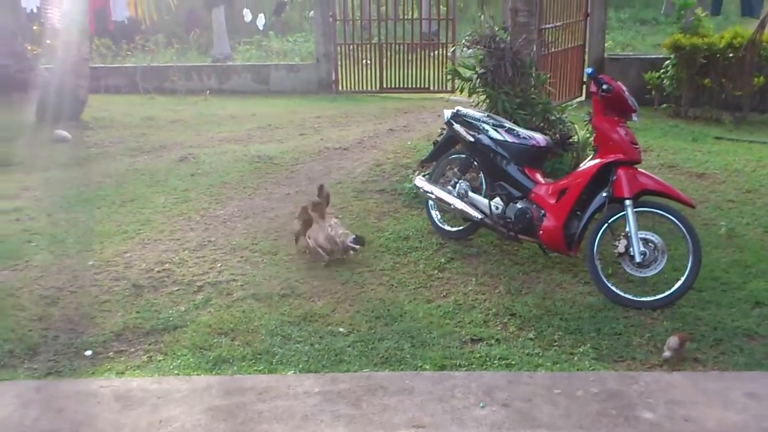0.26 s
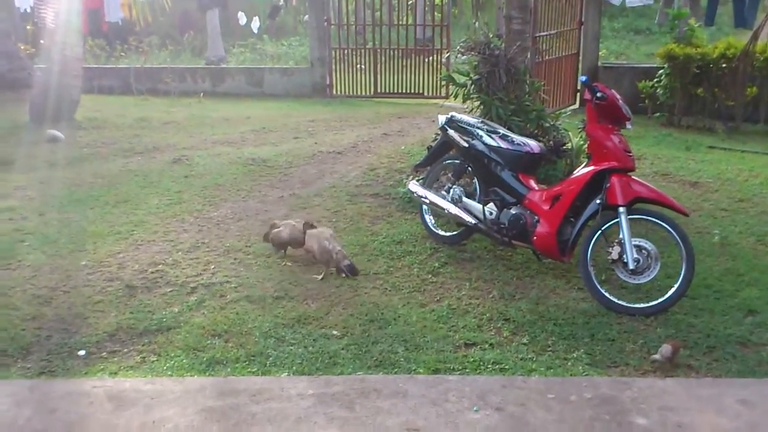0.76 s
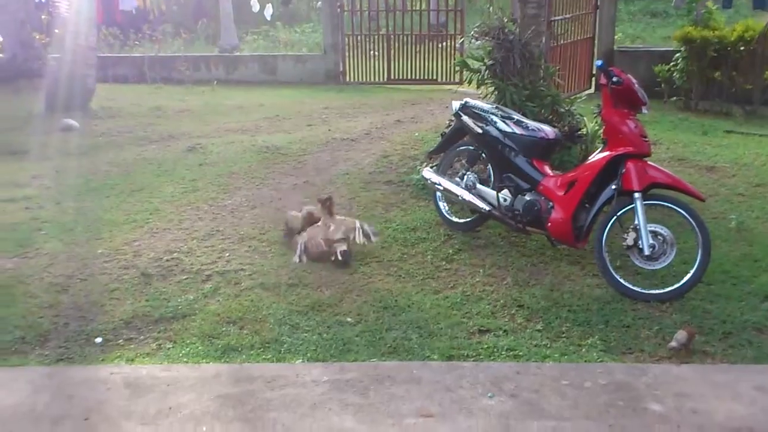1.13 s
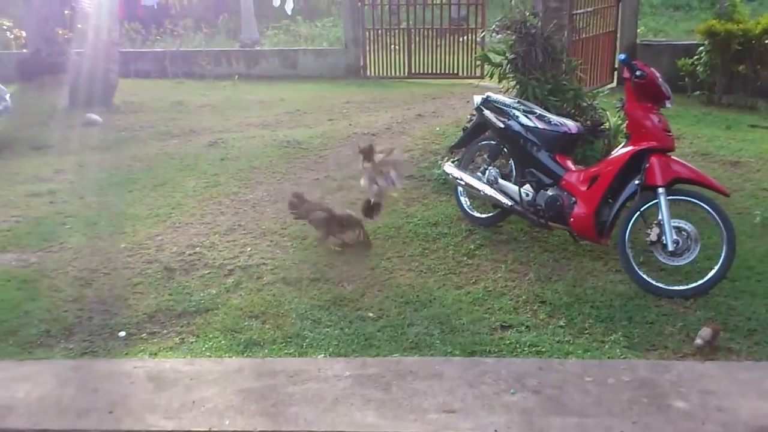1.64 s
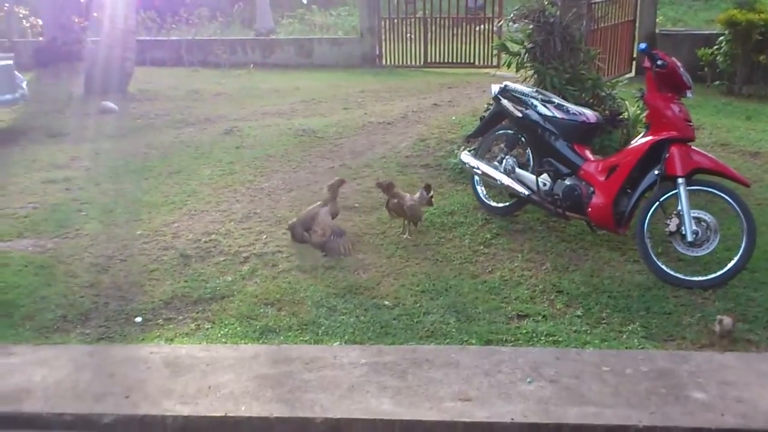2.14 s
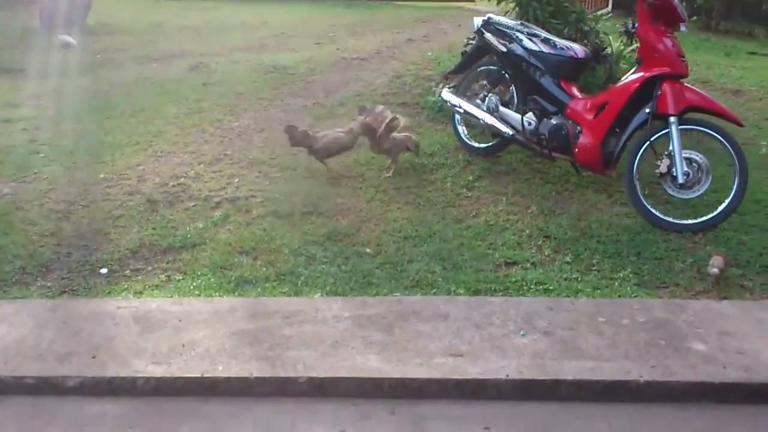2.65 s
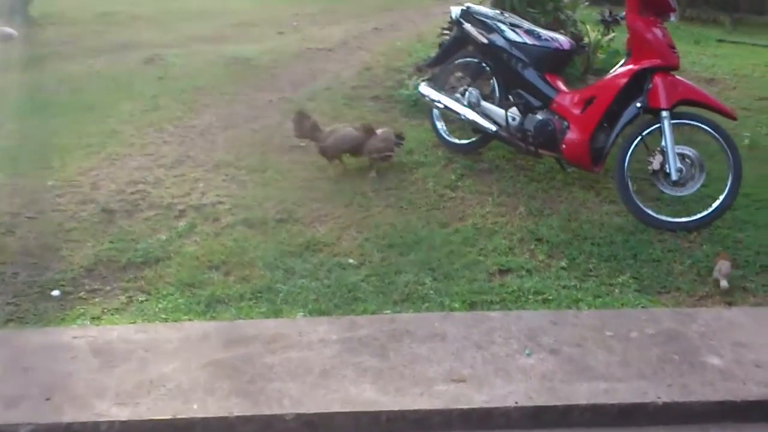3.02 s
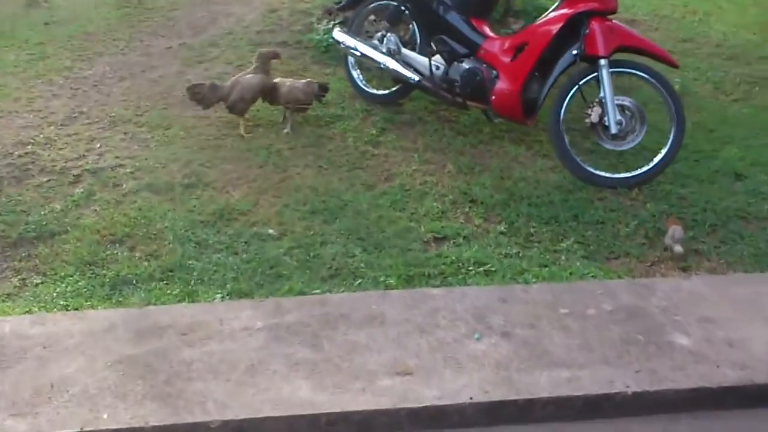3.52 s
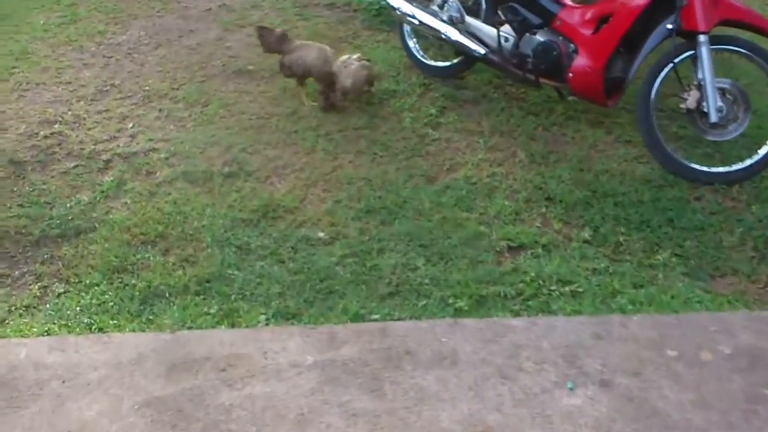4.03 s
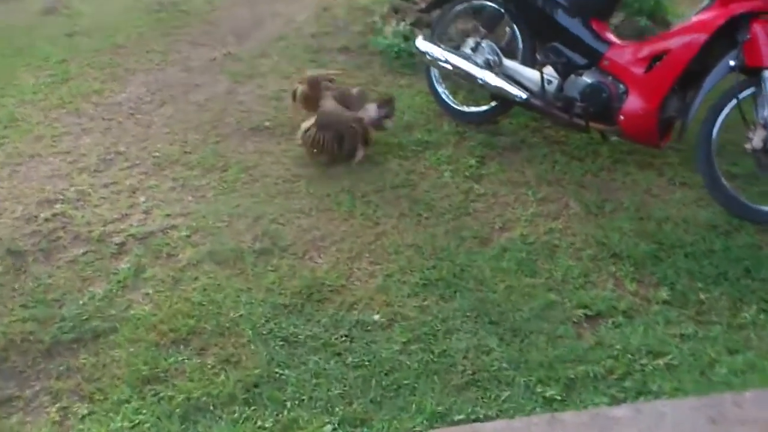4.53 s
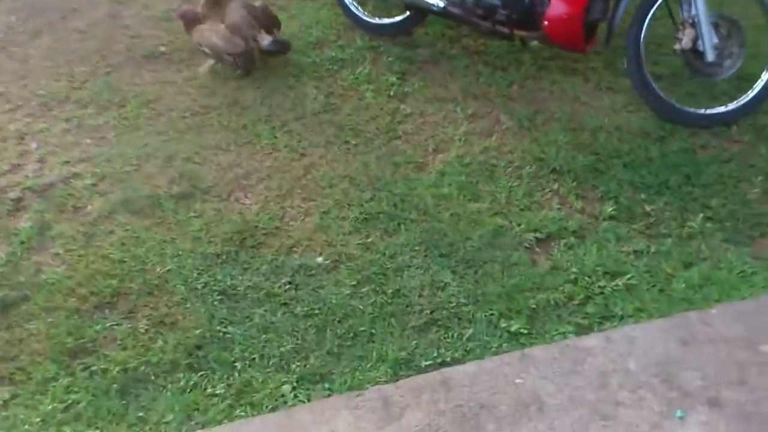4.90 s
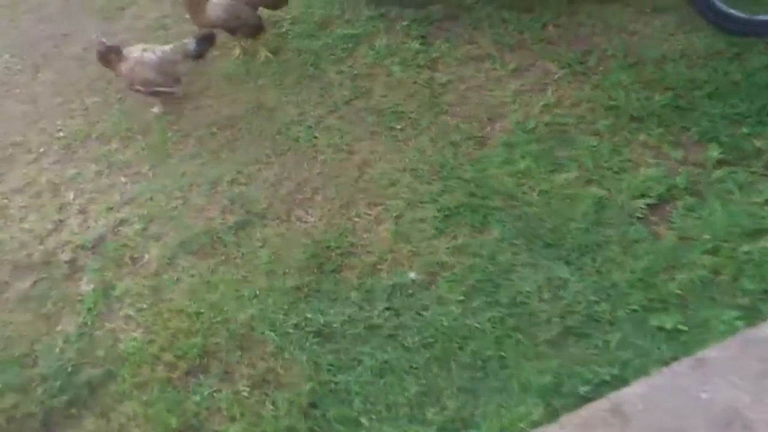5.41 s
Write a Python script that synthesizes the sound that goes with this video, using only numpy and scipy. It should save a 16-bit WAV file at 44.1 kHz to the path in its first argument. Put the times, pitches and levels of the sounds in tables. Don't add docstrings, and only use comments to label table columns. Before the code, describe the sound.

A hen scuffle a few metres from a small handheld stereo camera: a feather swish first, then two bursts of dry wing claps with soft thuds, then sparse faint flaps near the middle and after four seconds. Throughout, two chicks cheep in sliding, near-whistled tones, the closer one leaning left, the other right with strong wall reflections. Yard air rumbles and hisses; a far crow is barely audible.

```python
import sys
import numpy as np
from scipy import signal
from scipy.fft import rfft, irfft, next_fast_len
from scipy.io import wavfile
from scipy.ndimage import uniform_filter1d

SR = 44100
rng = np.random.default_rng(int(sys.argv[2]) if len(sys.argv) > 2 else 0)


def field_ratio(decibels):
    return 10 ** (np.asarray(decibels, dtype=float) / 20)


def master_out(mix):
    frames = np.transpose(np.atleast_2d(mix))
    ceiling = np.clip(frames, -1, 1)
    pcm = np.round(ceiling * 32767).astype(np.int16)
    wavfile.write(sys.argv[1], SR, pcm)


N = 249606
T = np.arange(N) / SR
SIZE = next_fast_len(N + SR)
HZ = np.maximum(np.arange(SIZE // 2 + 1) * SR / SIZE, 1)


def on_log(table, hz):
    f, v = np.transpose(table)
    return np.interp(np.log(hz), np.log(f), v)


def shape(x, gain):
    return irfft(rfft(x, SIZE) * gain, SIZE)[..., :N]


def band(lo_hz, hi_hz):
    return 1 / np.sqrt((1 + (lo_hz / HZ) ** 4) * (1 + (HZ / hi_hz) ** 4))


def above(edge_hz):
    return HZ > edge_hz


def unit(x):
    return x / np.sqrt(np.mean(x ** 2))


def walk(rate):
    k = int(SR / rate)
    held = np.repeat(rng.standard_normal(N // k + 1), k)
    return 1.28 * uniform_filter1d(uniform_filter1d(held, k), k)[:N]


def glides(notes):
    return [[(s, from_hz, db), (s + length, to_hz, db)] for s, length, from_hz, to_hz, db in notes]


def whistle(rows, wobble, shake_db, edge_s):
    s, hz, db = np.transpose(rows)
    i = np.arange(int((s[0] - edge_s) * SR), min(int((s[-1] + edge_s) * SR), N))
    pitch = uniform_filter1d(np.interp(T[i], s, hz), size=300) * (1 + wobble[i])
    phase = 2 * np.pi * np.cumsum(pitch) / SR
    to_edge = np.minimum(T[i] - T[i[0]], T[i[-1]] - T[i])
    fade = np.clip(to_edge / (2 * edge_s), 0, 1) ** 2
    return i, phase, np.sqrt(2) * fade * field_ratio(np.interp(T[i], s, db) + shake_db[i])


def cry(path, swell, db, octave_db, echo_db, head_db):
    at, hz = np.transpose(path)
    u = np.linspace(0, 1, num=33)
    s = at[0] + u * (at[-1] - at[0])
    head = np.exp(-(u / 0.23) ** 4)
    db = db + np.interp(u, *np.transpose(swell)) + head_db * head
    return np.transpose([s, np.interp(s, at, hz), db]), octave_db, echo_db


# place (0-1 hold, 1-2 fall), level_db
PEEP_SWELL = [(0, -7.5), (.35, -1), (.9, 1.5), (1.25, 3.5), (1.6, 2), (2, -3)]


def peep(law, knee, hold, fall, hz, db):
    scoop_hz, sag, drop = law
    u = np.linspace(0, 2, num=33)
    s = knee + (u - 1) * np.where(u < 1, hold, fall)
    scoop = scoop_hz * np.exp(-(s - s[0]) / .02)
    held = hz + sag * (knee - s) + scoop
    fallen = np.interp(u - 1, *np.transpose([(0.0039, hz)] + drop))
    pitch = np.where(u < 1, held, fallen)
    return np.transpose([s, pitch, db + np.interp(u, *np.transpose(PEEP_SWELL))])


# pitch_hz, level_db
THROAT = [(1500, -4), (2100, -4.5), (2700, -6.5), (3100, -1.5), (3800, 0.5), (4500, -3), (5300, -5),
          (6100, -7)]
# pitch_hz, left_minus_right_db
TONE_BALANCE = [(2000, -7), (2900, 6), (3300, 2.5), (3900, -8), (5300, -17.5), (6000, -15)]
# pitch_hz, left_lead_rad
TONE_LEAD = [(2200, 1.6), (3000, 0), (3900, -1.1), (5300, -1.5)]


def chick(calls, bearing, octave_db, echo_db, close):
    wobble, shake_db = .005 * walk(120), 1.64 * walk(110)
    out = np.zeros((2, 3, N))
    at, pans, leads = np.transpose(bearing)
    for rows, extra_db, wet_db in calls:
        i, phase, size = whistle(rows, wobble, shake_db, 0.0065)
        hz = np.gradient(phase) * SR / (2 * np.pi)
        pan_db = np.interp(T[i], at, pans) + close * on_log(TONE_BALANCE, hz)
        lead = np.interp(T[i], at, leads) + close * on_log(TONE_LEAD, hz)
        phase = phase + lead * np.array([[.5], [-.5], [0]])
        overtones = np.sin(2 * phase) + field_ratio(-16.5) * np.sin(3 * phase)
        upper = field_ratio(octave_db + extra_db + 8.5) * overtones
        send_db = echo_db + wet_db + 0 * hz
        gain = field_ratio(on_log(THROAT, hz) + np.array([pan_db / 2, -pan_db / 2, send_db]))
        out[:, :, i] += size * gain * [np.sin(phase), upper]
    return out[0] + shape(out[1], band(6350, 7550) ** 1.2)


# time_s, pitch_hz
CRIES = [
    [(1.937, 5790), (1.955, 5480), (1.98, 3920), (2.02, 3053), (2.05, 3174), (2.088, 3270)],
    [(2.025, 3130), (2.055, 2830), (2.085, 3025), (2.13, 2510)],
    [(2.412, 5370), (2.435, 5150), (2.46, 4040), (2.5, 3870), (2.53, 3266), (2.56, 3027), (2.588, 3220)],
    [(3.415, 5930), (3.44, 6020), (3.48, 4980), (3.5, 4060), (3.535, 3334), (3.565, 2500)],
    [(3.435, 3665), (3.5, 3513), (3.55, 3157), (3.645, 3095)],
    [(4.548, 5810), (4.565, 4440), (4.585, 3094), (4.61, 2903), (4.65, 3390), (4.685, 3056)],
    [(4.918, 4054), (4.95, 3975), (5.0, 3667), (5.035, 3330), (5.08, 2990)],
    [(5.015, 3300), (5.04, 3070), (5.06, 2374), (5.082, 1620)],
    [(5.425, 5280), (5.44, 5385), (5.472, 5190), (5.49, 3800), (5.54, 3526), (5.575, 3320), (5.605, 3010)],
]
# time_s, pitch_hz
GULP = [(3.575, 2490), (3.6, 2380), (3.61, 2076), (3.635, 1910), (3.651, 1550)]
# level_db, extra_octave_db, extra_echo_db, extra_head_db
CRY_VOICE = [(-30, -4, 2.5, -0.5), (-35.5, -3, 4.5, 7.5), (-33, 2, 2.5, 7.5), (-44.5, -0.5, 6, 1.5),
             (-41, -4.5, -1.5, -9), (-37, -5.5, -0.5, 11.5), (-30.5, -10, -2, -8.5), (-42, -4, 4.5, 14),
             (-32, -6, -1, 4.5), (-36, -12, -4.5, 4)]
# share (0-1), level_db
CRY_SWELL = [(0, -9), (.3, 1), (.6, 1.5), (1, -7)]
# start_s, length_s, from_hz, to_hz, level_db
NOTES = [(0.258, 0.047, 4900, 5170, -53), (1.368, 0.052, 2870, 2875, -48.5), (1.62, 0.037, 2916, 2880, -52),
         (1.938, 0.038, 5100, 4710, -38), (2.059, 0.047, 2180, 1940, -44.5),
         (2.088, 0.018, 2480, 2070, -41), (2.565, 0.025, 2670, 1730, -37),
         (3.296, 0.055, 5050, 4840, -53.5), (4.652, 0.035, 2640, 1790, -42),
         (4.906, 0.063, 5750, 5080, -51), (4.915, 0.056, 4950, 4440, -43), (5.577, 0.03, 2540, 1840, -45)]
# time_s, left_minus_right_db, left_lead_rad
NEAR_BEARING = [(.3, 12, 0), (2.0, 8, -1), (2.5, 7, -1), (3.45, 5, .6), (3.6, 6, 0), (4.6, 9, -1.2),
                (4.93, 1, -4.1), (5.0, 8, -3.1), (5.5, 8, -3)]


def near_chick():
    squeals = [cry(path, CRY_SWELL, *voice) for path, voice in zip(CRIES + [GULP], CRY_VOICE)]
    notes = [(rows, 0, -0.5) for rows in glides(NOTES)]
    return chick(squeals + notes, NEAR_BEARING, octave_db=-15, echo_db=-10, close=1)


# break_s, hold_s, fall_s, break_pitch_hz, level_db
STEPPED = [
    (0.476, 0.063, 0.13, 3480, -50),
    (1.2, 0.045, 0.092, 3498, -44.5),
    (2.39, 0.077, 0.075, 3442, -44),
    (2.776, 0.079, 0.059, 3545, -41.5),
    (4.661, 0.079, .04, 3460, -45.5),
]
# break_s, hold_s, fall_s, break_pitch_hz, level_db
SLIDING = [
    (1.381, 0.11, 0.12, 3585, -46.5),
    (2.295, 0.094, .125, 3510, -46),
    (4.005, 0.1, .045, 3446, -46.5),
    (4.155, 0.11, .1, 3456, -47),
]
STEPPED_LAW = 100, 4000, [(.25, 3080), (.6, 2960), (1, 2420)]
SLIDING_LAW = 560, 1800, [(.27, 3150), (.55, 2750), (1, 2460)]
# time_s, pitch_hz
WALL_CRIES = [
    [(.265, 4000), (.29, 3710), (.34, 3430), (.375, 3360), (.4, 2890), (.435, 2640), (.46, 2430)],
    [(1.03, 3945), (1.08, 3685), (1.14, 3632), (1.165, 3120), (1.19, 3060), (1.215, 2360)],
    [(2.835, 4025), (2.865, 3403), (2.895, 3300), (2.91, 2958), (2.97, 2664)],
    [(3.352, 3980), (3.375, 3664), (3.41, 3260), (3.45, 2984), (3.5, 2570)],
    [(5.1, 3770), (5.14, 3560), (5.19, 3394), (5.205, 3150), (5.23, 2800), (5.29, 2465)],
    [(5.35, 4430), (5.37, 4130), (5.385, 3245), (5.43, 3100), (5.475, 2930), (5.5, 2450)],
]
# level_db, extra_octave_db, extra_echo_db, extra_head_db
WALL_VOICE = [(-38.5, -3, 3.5, -0.5), (-45, 2.5, 2, 2.5), (-42, -2.5, 2, 4), (-46.5, -5, 7.5, 4.5),
              (-46, -5, 2, 6.5), (-40, -4, -2.5, -4.5)]
# share (0-1), level_db
WALL_SWELL = [(0, -7), (.2, -3), (.6, 0), (.8, -0.5), (1, -15.5)]
# time_s, left_minus_right_db, left_lead_rad
WALL_BEARING = [(.3, -4, -.2), (1.1, -5, 0), (1.4, -3, .3), (2.3, -5, .2), (2.75, -5, .4), (3.4, -10, 0),
                (4.1, -10, 0), (5.15, -10, -.2), (5.4, -12, -1)]


def wall_chick():
    peeps = [peep(STEPPED_LAW, *row) for row in STEPPED] + [peep(SLIDING_LAW, *row) for row in SLIDING]
    cries = [cry(path, WALL_SWELL, *voice) for path, voice in zip(WALL_CRIES, WALL_VOICE)]
    calls = [(rows, 0, 0) for rows in peeps] + cries
    return chick(calls, WALL_BEARING, octave_db=-18.5, echo_db=-1, close=0)


# start_s, crack_peak_db, slap_relative_db, thud_relative_db
CLAPS = [(0.9698, -33, -30, -39), (0.9733, -37, -9, -16), (0.9973, -36, -17, -12),
         (1.0093, -31, -9.5, -15.5), (1.4452, -44, 0, -4), (1.511, -32, -12, -17), (1.5108, -25, -28, -35),
         (1.5182, -40, -33, -2.5), (1.5269, -34, -24, -48), (1.5583, -36.5, -4, -11.5),
         (1.5895, -46.5, -16, 3), (1.6135, -50, 3.5, -23), (1.633, -34, -18, -27), (1.6677, -29, -9, -17),
         (1.8117, -44.5, -24, -4.5), (2.2339, -47, -24, -19), (2.8079, -43.5, -6.5, -25),
         (4.3224, -51, 2, -29), (4.3446, -51, 4, -25), (4.372, -49, -17, -17), (4.4428, -44.5, -9, -32),
         (4.574, -57.5, 8.5, -23)]


def claps():
    t, out = T[:SR // 8], np.zeros((3, N))
    for s, db, mid_db, thud_db in CLAPS:
        i = int((s + .0009) * SR)
        noise = rng.standard_normal((3, len(t)))
        snap = 3.2 * np.exp(-t / .00014) * np.sin(2 * np.pi * 10500 * t)
        crack = snap + noise[0] * (0.86 * np.exp(-t / 0.0012) + 0.04 * np.exp(-t / 0.014))
        slap = noise[1] * np.exp(-t / 0.0055)
        thud = noise[2] * t / 0.0059 * np.exp(1 - t / 0.0046)
        out[:, i:i + len(t)] += field_ratio(db + np.array([[0], [mid_db], [thud_db]])) * [crack, slap, thud]
    edges = [(3, 1760, 8800), (9, 580, 2300), (18, 32, 270)]  # (dB, low Hz, high Hz)
    total = 0
    for x, (db, lo, hi) in zip(out, edges):
        sos = signal.butter(2, [lo, hi], "band", fs=SR, output="sos")
        total = total + field_ratio(db) * signal.sosfilt(sos, x)
    return total


# centre_s, rise_s, fall_s, treble_db, mid_relative_db
RUSTLE = [(0.088, 0.021, 0.017, -43.5, -8.5), (0.987, 0.022, 0.021, -49, -20),
          (1.013, .01, 0.054, -46.5, -11.5), (1.45, 0.0053, 0.035, -50, -4), (1.53, 0.02, 0.035, -45.5, -7),
          (1.62, 0.036, 0.05, -53, -5), (1.68, 0.018, 0.091, -55, -14), (1.815, 0.032, 0.055, -57.5, -4),
          (4.26, 0.0082, 0.058, -58.5, -3.5), (4.335, .015, .015, -65, -6),
          (4.367, 0.019, 0.016, -49.5, -2), (4.442, 0.021, 0.072, -61, -7)]
# frequency_hz, level_db (per Hz)
FEATHER = [(300, -4.5), (900, -12), (2000, -5.5), (4000, 8), (7000, 6.5), (10000, 1.5), (12500, -12),
           (16000, 6)]


def rustle():
    unevenness_db = 1.5 * rng.exponential(size=N) + 2.5 * walk(130)
    grains = rng.standard_normal((2, N)) * field_ratio(unevenness_db)
    colour = field_ratio(on_log(FEATHER, HZ))
    high, mid = (unit(shape(grains + grains[0], colour * g)) for g in (band(1500, 24000), band(100, 1330)))
    out = 0
    for s, rise_s, fall_s, db, mid_db in RUSTLE:
        rise = np.exp(-((T - s) / rise_s) ** 2)
        fall = np.exp(-np.abs(T - s) / fall_s)
        out = out + np.where(T < s, rise, fall) * field_ratio(db) * (high + field_ratio(mid_db) * mid)
    return out


# delay_s, smear_s, level_db
ECHOES = [
    (.004, 0.003, -3.5),
    (.03, 0.016, 1.5),
    (.07, .03, -6.5),
    (.12, .035, -12),
    (.2, .05, -16.5),
]


def yard_echo(x):
    t = T[:SR]
    t60_s, tail_db = 0.61, -19
    tail = unit(field_ratio(-60 * t / t60_s) * np.clip(t / 0.018, 0, 1))
    power = tail ** 2 * field_ratio(2 * tail_db) / SR
    for s, smear_s, db in ECHOES:
        bounce = unit(np.exp(-((t - s) / smear_s) ** 2) * (t > .001))
        power = power + field_ratio(2 * db) * bounce ** 2 / SR
    reply = rng.standard_normal((2, SR)) * np.sqrt(power)
    return shape(x, rfft(reply, SIZE) * band(600, 6800))


# start_s, length_s, from_hz, to_hz, level_db
CROW = [
    (3.245, 0.11, 980, 978, -67),
    (3.5, 0.26, 985, 906, -73),
    (3.3, 0.46, 1670, 1650, -74.5),
    (3.9, 0.29, 1570, 1525, -70.5),
    (4.9, 0.068, 955, 970, -71),
    (5.465, 0.027, 1480, 1460, -60),
]


def far_crow():
    out, wobble, shake_db = np.zeros(N), 0.0091 * walk(40), 4 * walk(30)
    for rows in glides(CROW):
        i, phase, size = whistle(rows, wobble, shake_db, .02)
        out[i] += size * np.sin(phase)
    return out


# frequency_hz, left_minus_right_db
PORT_BALANCE = [(40, -3), (110, -1.5), (300, 0.5), (2400, -.5), (4400, -8.5), (6500, 1), (8000, 6.5),
                (9500, 22.5), (11700, 30.5), (12800, 17), (15500, -5)]


def ports(x):
    db = on_log(PORT_BALANCE, HZ)
    return shape(x, field_ratio(np.array([db, -db]) / 2))


# frequency_hz, level_db (per Hz)
YARD = [(15, -27), (25, -9.5), (80, -4), (117, -3.5), (182, -10), (254, -12.5), (425, -16.5), (676, -20),
        (769, -21.5), (2160, -23.5), (3340, -22.5), (3610, -18), (11800, -24), (15300, -45), (22000, -120)]
# frequency_hz,
# level_db
YARD_TOP = [(11800, 5.5), (12200, -61), (14000, 2.5), (15700, -4), (16000, -45)]
# frequency_hz, likeness (0-1)
LIKENESS = [(60, 0.76), (130, 0.8), (290, 0.57), (640, 0.46), (1410, 0.02), (3100, 0), (6820, 0),
            (15000, 0)]
# centre_s, half_width_s, bass_rise_db, mid_rise_db
GUSTS = [(0, 0.16, -1.5, 4), (.6, 0.053, 9, 2.5), (.84, 0.041, 6, 3), (1.049, 0.19, 3.5, 3),
         (1.59, 0.07, 7, 1), (2.251, .04, 1.5, 2), (3.3, 1, 2, 0.5), (3.78, 0.03, 0.5, 2.5),
         (4.35, 0.42, 1.5, 2), (5.26, 0.072, 5.5, 0.5), (5.611, .06, 5, -1.5)]


def yard_air():
    mid, side = rng.standard_normal((2, N))
    alike = np.clip(on_log(LIKENESS, HZ), -.95, .95)
    colour = field_ratio(on_log(YARD[:-2], HZ) + on_log(YARD_TOP, HZ))
    common = rfft(mid, SIZE) * colour * np.sqrt(1 + alike)
    differing = rfft(side, SIZE) * colour * np.sqrt(1 - alike)
    pair = np.array([common + differing, common - differing])
    rises = sum(np.outer(db, np.exp(-((T - s) / wide_s) ** 2)) for s, wide_s, *db in GUSTS)
    bass_db, mid_db = rises - [[1.5], [0.7]]
    out, hiss_db = 0, .5 * walk(0.067)
    for octave in np.arange(4, 15):
        part = np.cos(np.pi / 2 * np.clip(np.log2(HZ) - octave, -1, 1)) ** 2
        swell_db = bass_db if octave < 8 else mid_db if octave < 12 else hiss_db
        out = out + field_ratio(swell_db + 0.17 * walk(4.65)) * irfft(pair * part, SIZE)[:, :N]
    out = ports(out)
    return out * field_ratio(-55.5) / np.sqrt(np.mean(out.mean(axis=0) ** 2))


def scene():
    chicks = near_chick() + wall_chick()
    peeps, send = chicks[:2], chicks[2]
    hens = ports(claps() + rustle())
    echo = yard_echo(send + field_ratio(-9) * hens.mean(axis=0))
    return peeps + hens + echo + far_crow() + yard_air()


def low_pass(x):
    return signal.sosfilt(signal.butter(12, 16820, fs=SR, output="sos"), x)


def record(dry):
    return low_pass(dry)


dry = scene()
out = record(dry)
master_out(out)
```